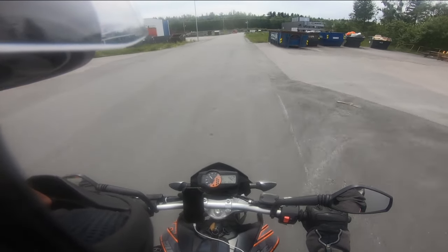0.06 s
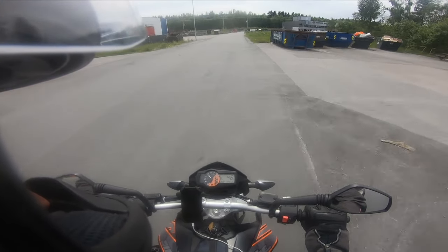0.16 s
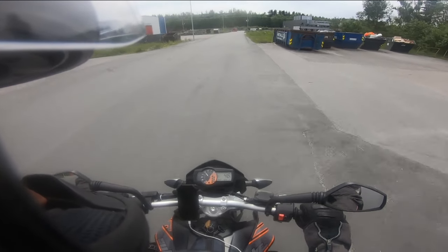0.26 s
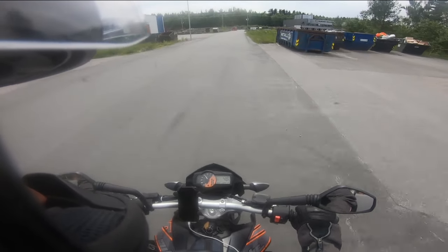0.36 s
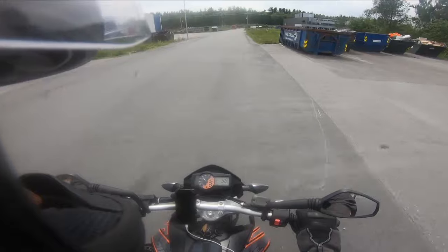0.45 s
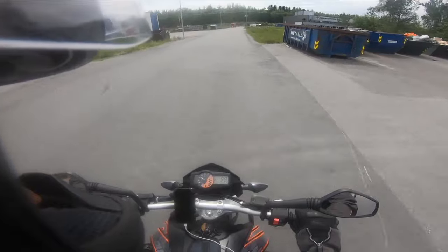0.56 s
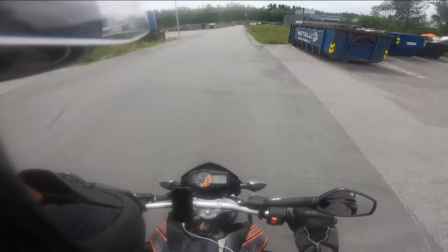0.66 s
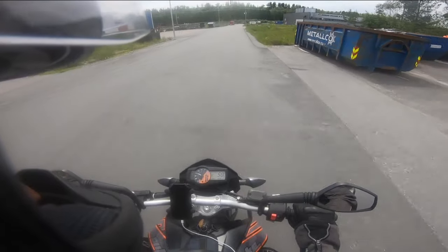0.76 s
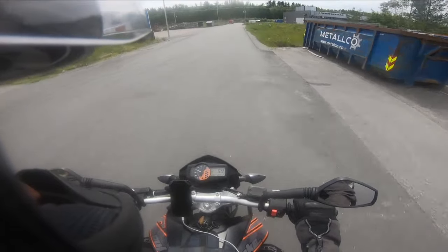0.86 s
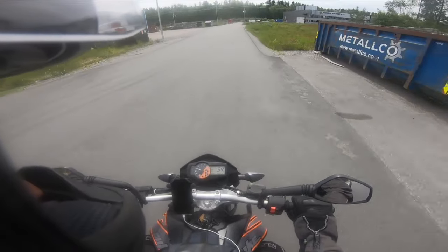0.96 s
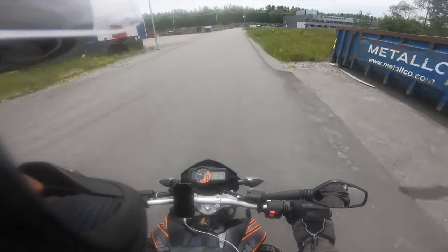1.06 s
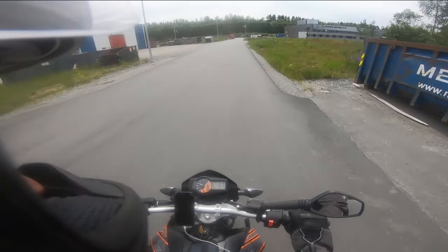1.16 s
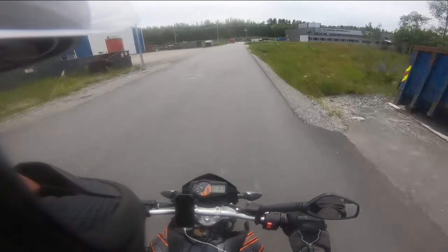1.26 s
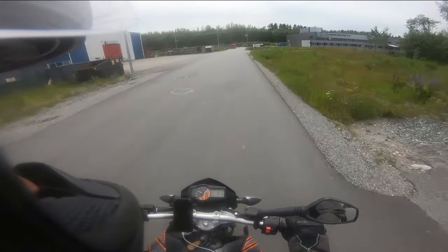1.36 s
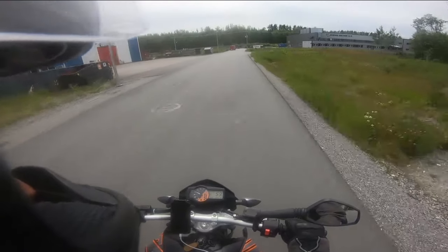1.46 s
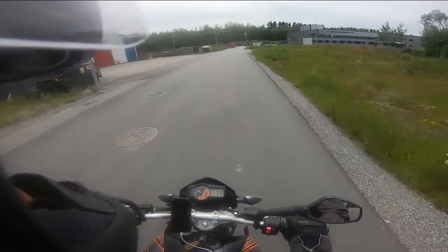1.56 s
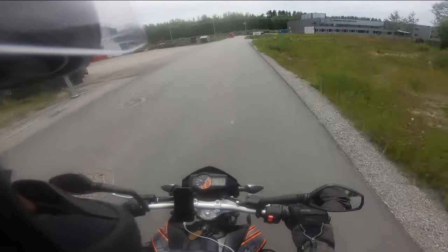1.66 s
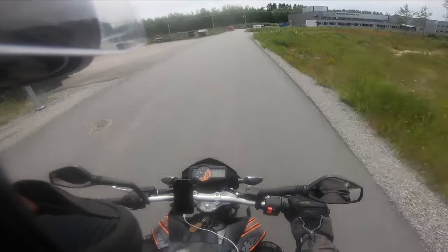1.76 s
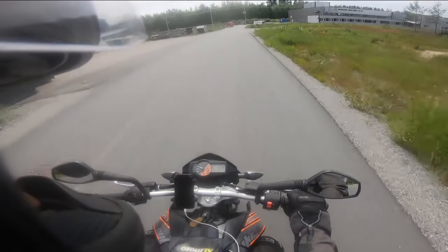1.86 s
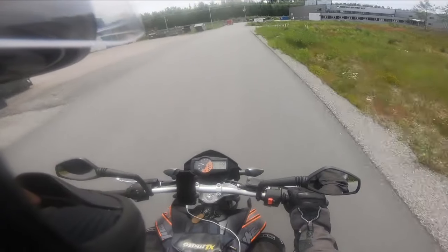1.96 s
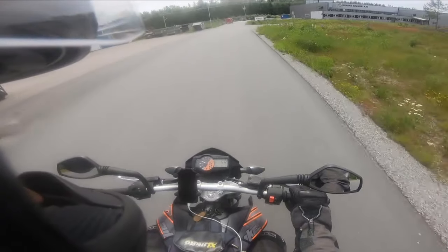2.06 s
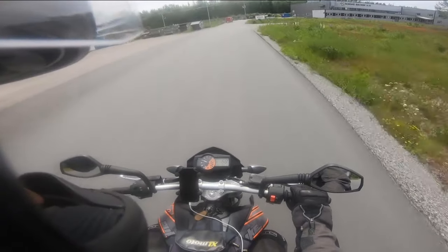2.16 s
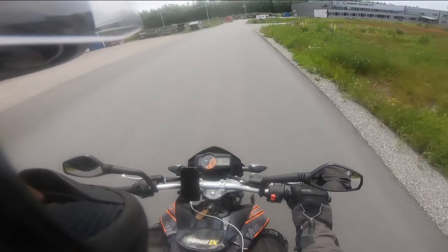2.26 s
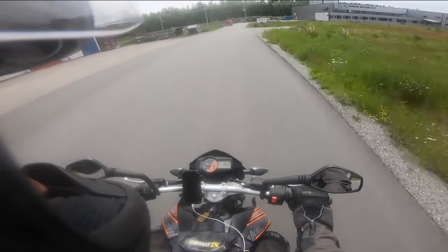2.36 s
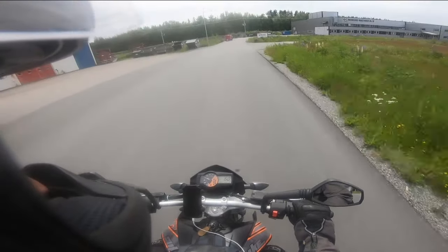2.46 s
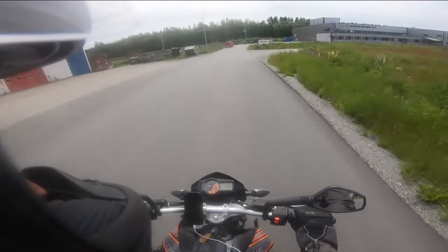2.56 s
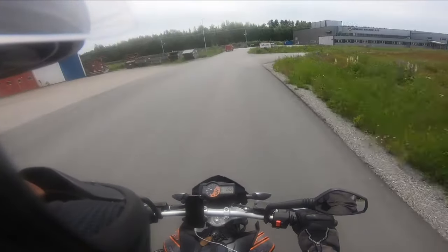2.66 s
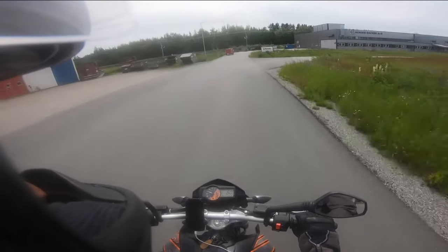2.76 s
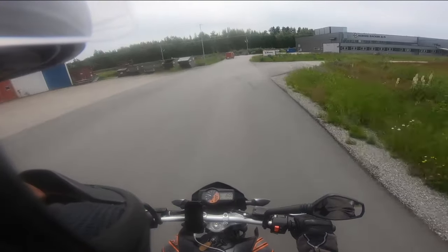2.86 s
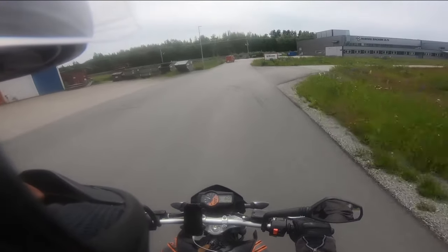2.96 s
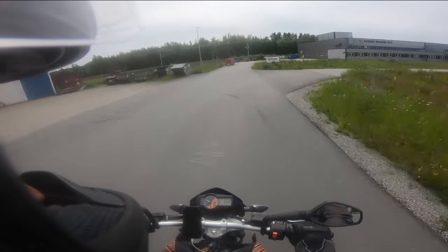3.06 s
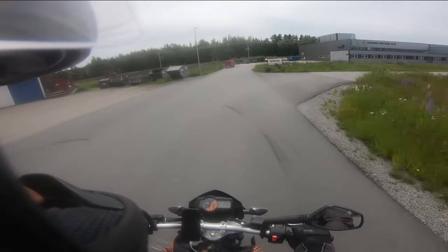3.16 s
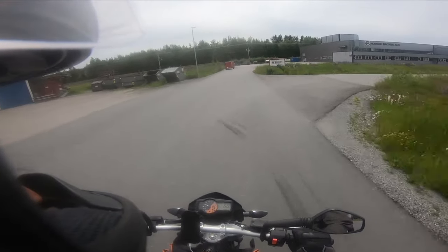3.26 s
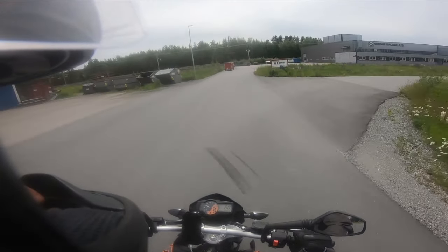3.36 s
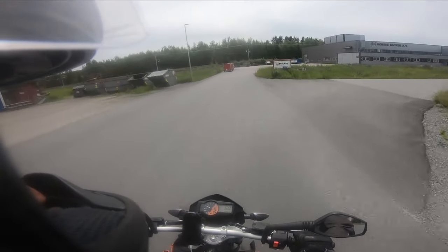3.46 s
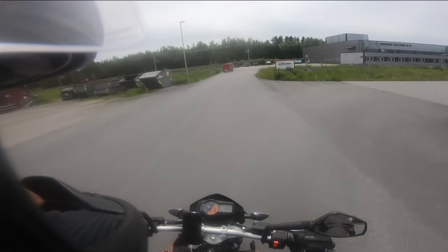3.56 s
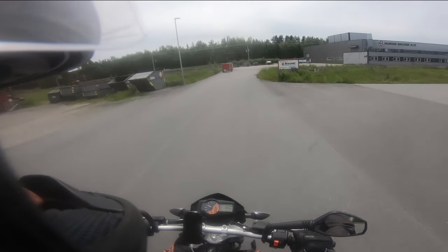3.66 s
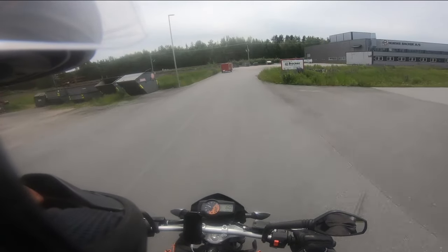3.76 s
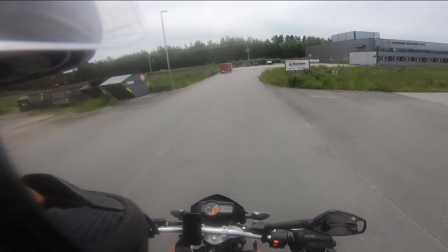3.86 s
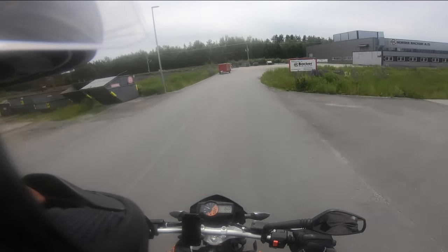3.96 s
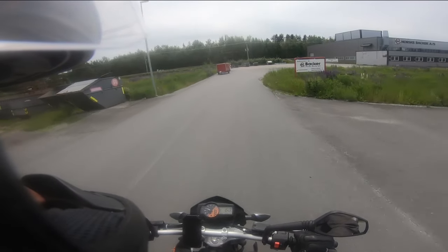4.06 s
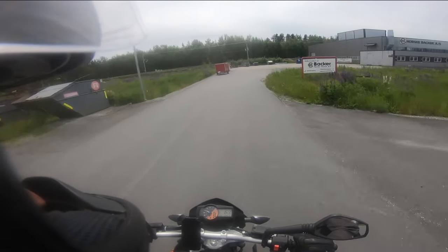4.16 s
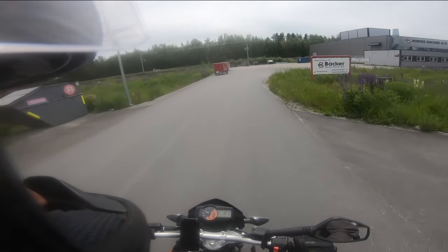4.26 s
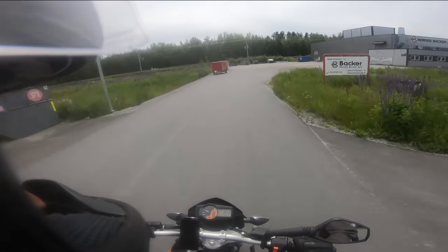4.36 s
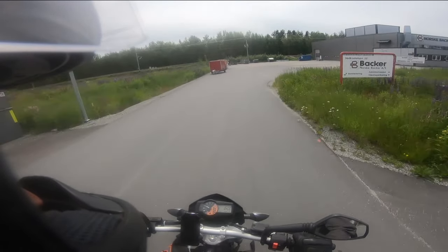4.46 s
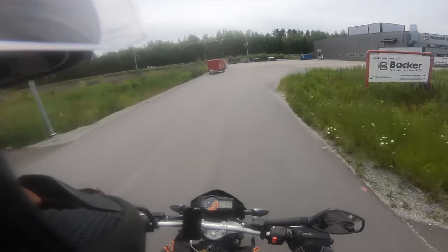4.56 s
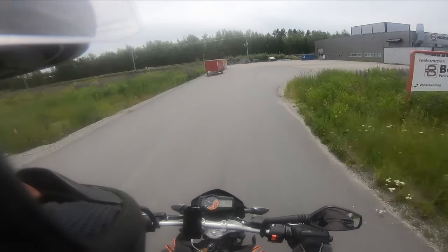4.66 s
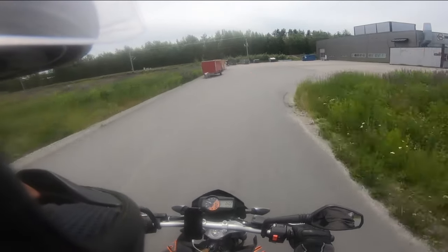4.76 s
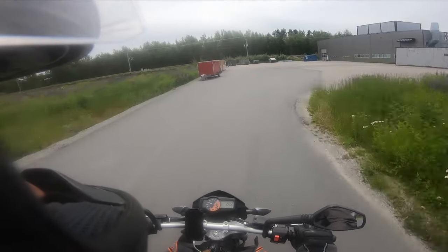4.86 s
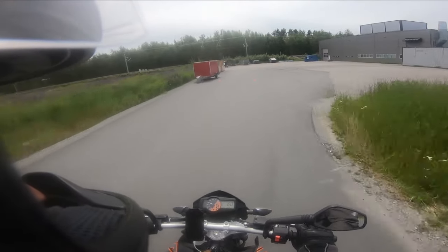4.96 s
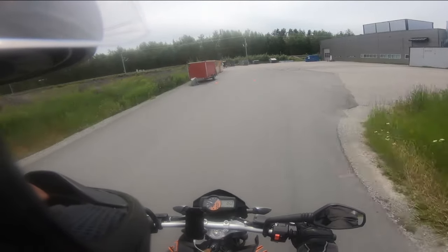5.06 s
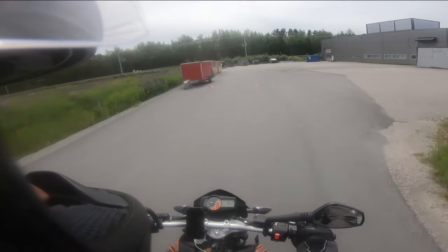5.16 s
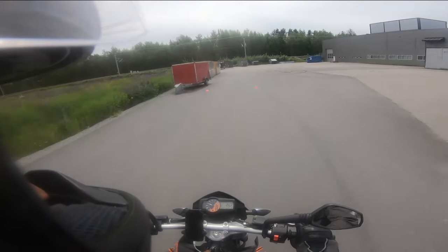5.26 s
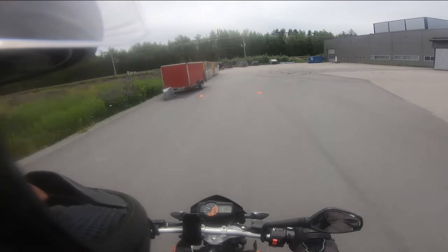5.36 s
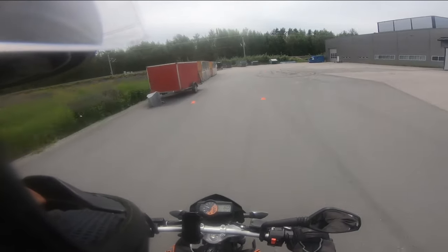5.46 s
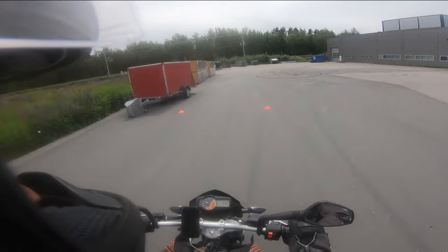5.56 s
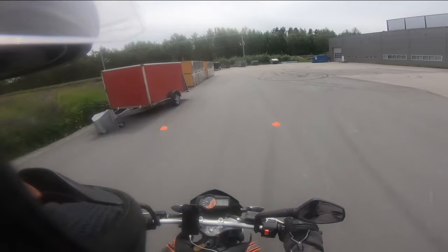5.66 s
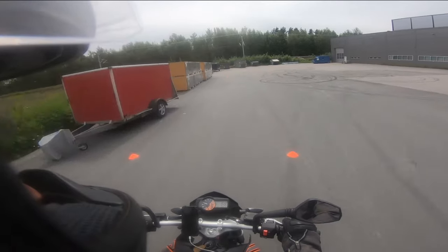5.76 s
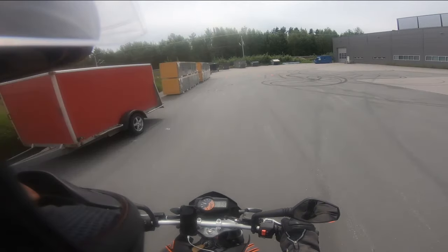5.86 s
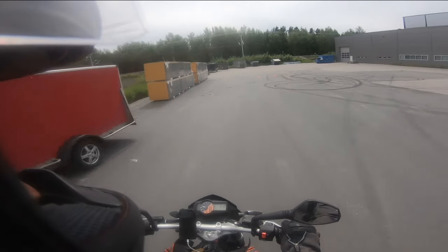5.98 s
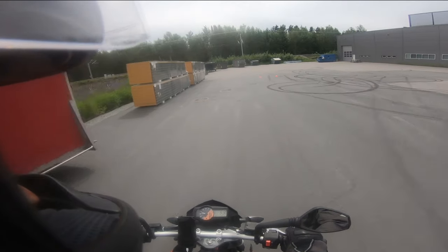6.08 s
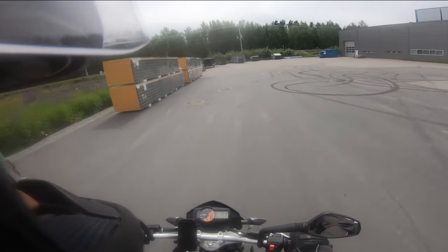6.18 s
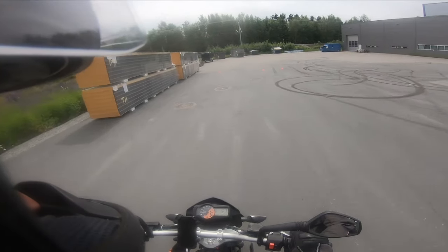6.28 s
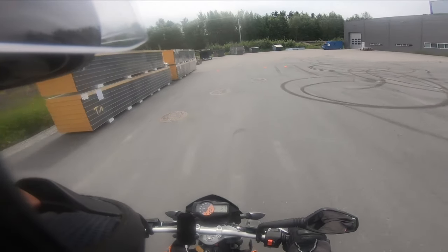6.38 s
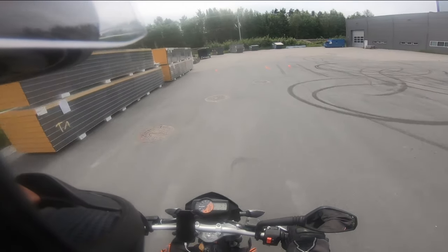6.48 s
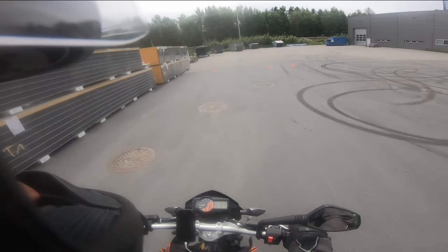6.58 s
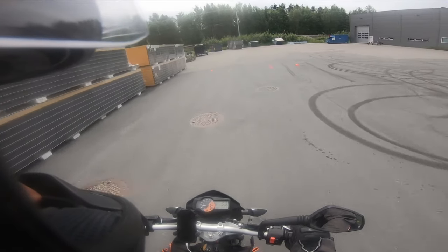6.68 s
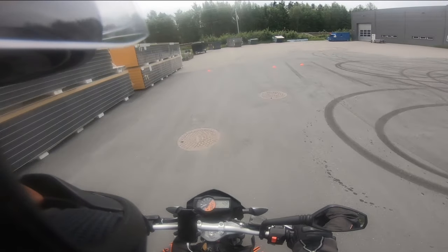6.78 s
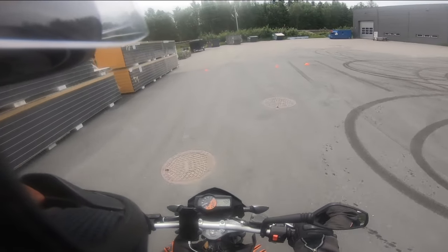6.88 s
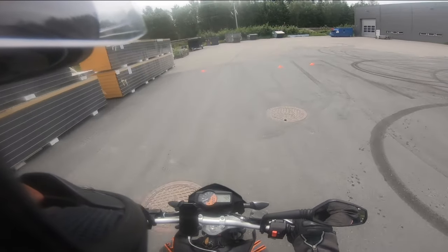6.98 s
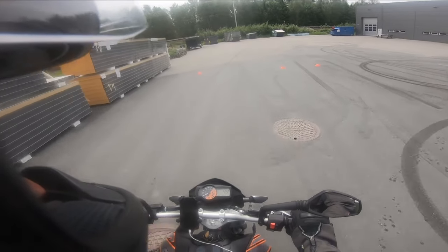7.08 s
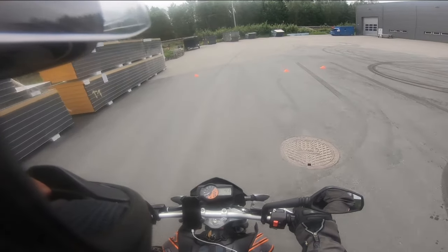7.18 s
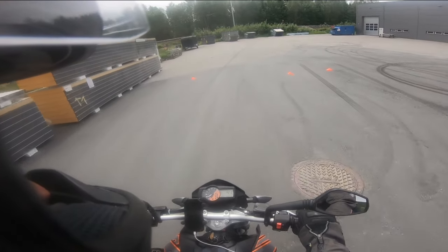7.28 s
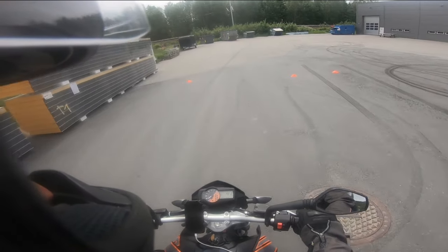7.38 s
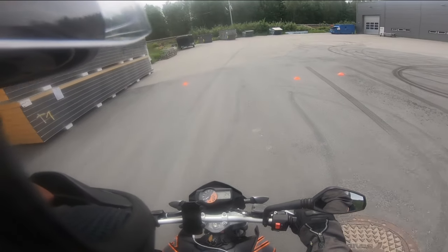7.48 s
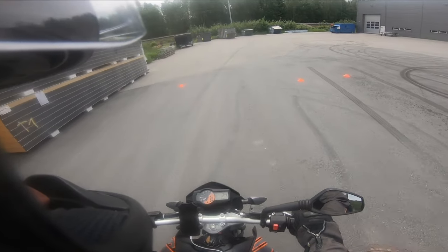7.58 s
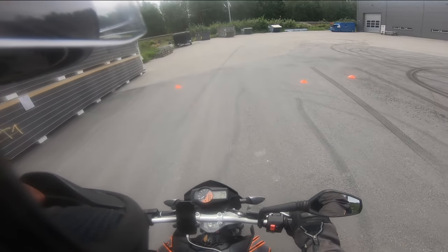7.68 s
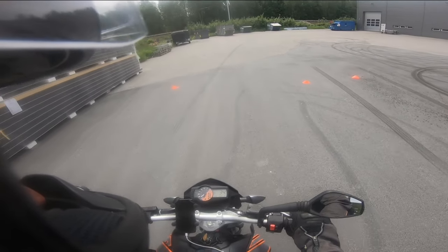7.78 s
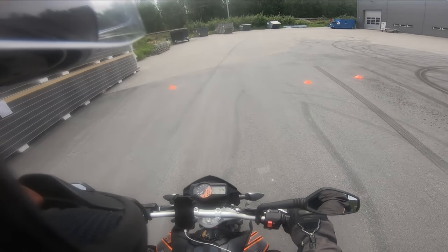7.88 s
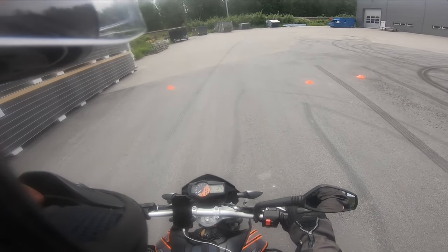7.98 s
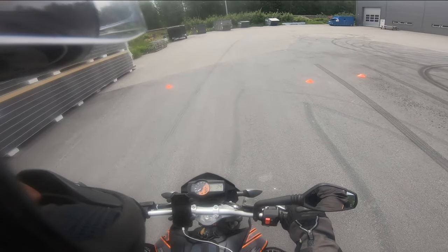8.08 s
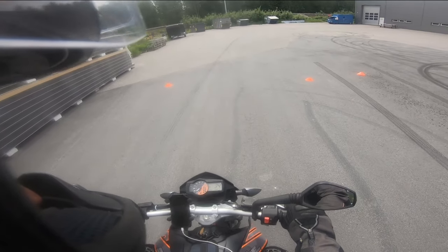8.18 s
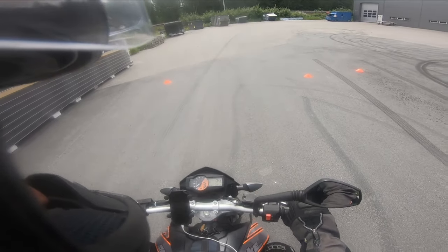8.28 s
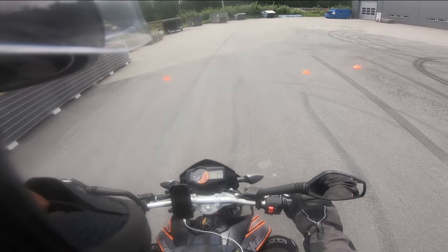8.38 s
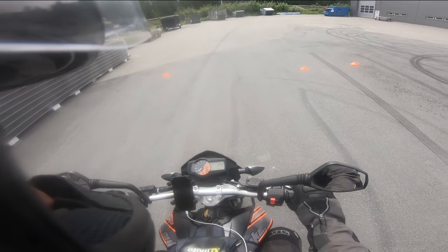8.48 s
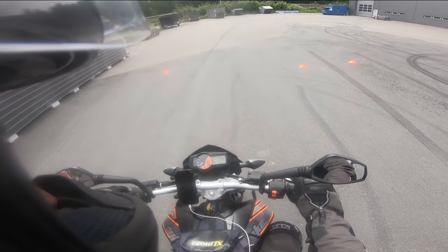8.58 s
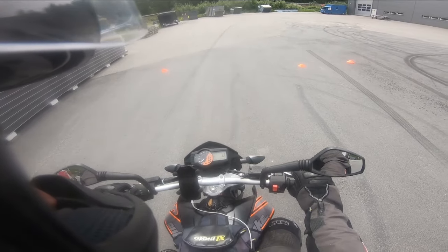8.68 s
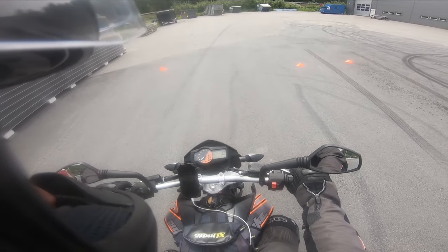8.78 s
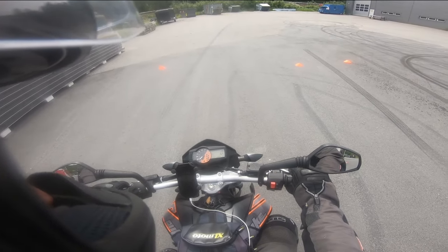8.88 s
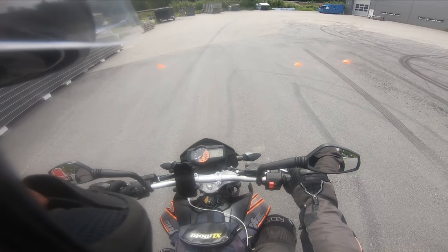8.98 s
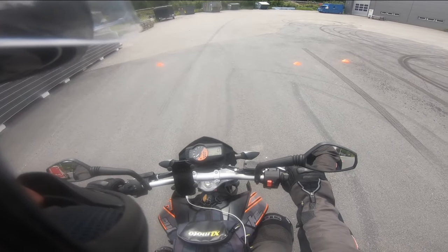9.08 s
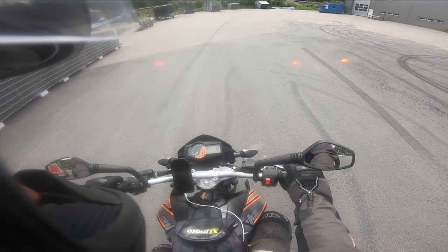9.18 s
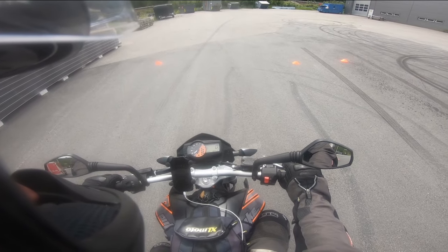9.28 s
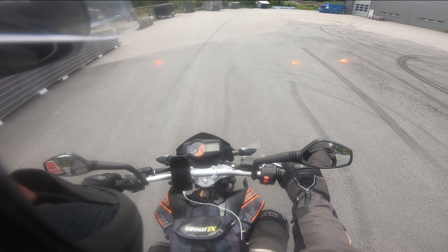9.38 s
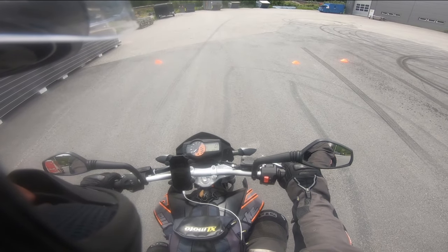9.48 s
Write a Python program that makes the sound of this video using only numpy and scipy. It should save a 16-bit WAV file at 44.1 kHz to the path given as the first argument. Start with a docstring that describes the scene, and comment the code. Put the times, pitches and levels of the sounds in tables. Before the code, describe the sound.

From a rider's helmet, loud low wind roar and buffeting with a wavering hollow note masks a motorcycle engine for about six seconds in an open lot. The wind then drops in uneven, darker puffs, the brake gives a faint short groan, and a slow single-cylinder idle emerges: deep exhaust thumps, ringing knocks, clattering valves, and one small metallic rattle.

```python
"""Motorcycle braking to idle

A single-cylinder motorcycle rolls across an open lot and brakes to a stop, heard from the rider's helmet.
Shaped noise follows the airspeed as wind; a gliding sine is the wavering low note shed off the helmet.
As the wind dies away in puffs the brake groans briefly, a slightly wavering tone, and the idle comes through:
a ringing knock and a low exhaust thump per firing, engine clatter, valve taps, a few ticks, one metallic rattle."""
import sys
import numpy as np
from scipy import signal
from scipy.fft import rfft, irfft, next_fast_len
from scipy.io import wavfile
from scipy.ndimage import uniform_filter1d

SR = 44100
rng = np.random.default_rng(int(sys.argv[2]) if len(sys.argv) > 2 else 0)


def unload_audio(sound):
    """Save the sound as a 16-bit wav file, at the path given as the first command line argument."""
    columns = np.transpose(np.atleast_2d(sound))
    # keep every value between -1 and 1, then stretch to whole-number steps
    steps = np.round(np.clip(columns, -1, 1) * 32767)
    wavfile.write(sys.argv[1], SR, steps.astype(np.int16))


N = 420273

# light air at the standstill: start_s, level_db
BREEZE = [(7.6, -54), (7.95, -36), (8.08, -44), (8.2, -36), (8.7, -28.5), (9, -28.5), (9.28, -31.5),
          (9.38, -24), (9.53, -21.5)]
# its spectrum: freq_hz, density_db_per_hz
BREEZE_COLOUR = [(20, -9.5), (55, -1.5), (110, -1), (170, -14.5), (300, -23.5), (800, -44.5), (3000, -70.5)]

# air passing the helmet: start_s, airspeed_m_per_s, turbulence_db
AIRFLOW = [(0, 10.04, -4), (1.05, 9.8, -3.5), (1.5, 8.9, 0), (1.9, 10.34, -3.5), (2.5, 9.96, -2.5),
           (2.75, 10.65, 1.5), (3.5, 11, 0), (4.4, 9.84, 0), (5.4, 10.28, 1), (6.2, 7.86, -1.5),
           (6.5, 5.95, -0.5), (7.0, 5.15, 1), (7.25, 2.87, 2), (7.87, 2.35, -2.5), (7.95, 1.3, -3),
           (8.2, .1, 3)]
RIDING_M_PER_S = 10
# borders between buffeting, roar, rush and hiss: edge_hz
WIND_EDGES_HZ = [141.4, 714, 2214]
# spectrum of the airflow: freq_hz, density_db_per_hz
WIND_COLOUR = [(12, -50), (20, -17.5), (102, -2), (250, -4.5), (303, -4), (387, -7.5), (1020, -11),
               (1740, -19), (2970, -36), (3880, -35), (5720, -45), (6620, -58), (8610, -76), (14600, -120)]
# ranges of eddies: level_at_riding_speed_db, airspeed_power, turbulence_share
ROAR, RUSH, HISS = (-16.5, 1.72, 0.62), (-22.5, 2.43, 1), (-35, 2.77, .05)
# gusts, and lulls where the strength is negative: centre_s, half_length_s, strength_db, brightness_db
GUSTS = [(0.644, 0.045, 1.5, 1), (1.301, 0.11, 3, -1.5), (1.587, 0.087, 1.4, -1.5), (1.731, 0.096, 0, -1.5),
         (2.874, 0.031, 2, 2.2), (3.77, 0.027, 1.5, 0), (3.894, 0.018, 2.5, 1), (4.09, 0.024, -1.5, -.5),
         (4.243, 0.043, 1.5, 1.5), (4.337, 0.035, -2, -1.5), (4.679, 0.088, 0.7, .5),
         (4.856, 0.033, -1, -2.2), (4.99, 0.035, 1.2, 3), (5.151, 0.078, -0.6, 0), (5.357, 0.023, 0.5, 1),
         (5.568, 0.035, -1.7, -1.5), (5.808, 0.079, 2, 2.5), (5.974, 0.092, 0.5, -2.5),
         (6.213, 0.16, 2.4, -1), (6.35, 0.013, -4.5, 1), (6.71, 0.06, -2, 2.5), (6.967, 0.1, 3.5, -3),
         (7.403, 0.063, 3.5, -1), (7.59, 0.04, 5, -2), (7.712, 0.045, 3.5, -6), (7.87, 0.02, -1.5, 7)]
# share of dull eddies gained as the air slows
DARKENS_BELOW_M_PER_S, DARKENING_PER_M_PER_S = 9.2, 0.11
# big eddies striking the microphone port: start_s, level_at_riding_speed_db
BUFFET = [(.25, -17.5), (.5, -20.5), (1.55, -17), (1.85, -19.5), (2.25, -26.5), (2.45, -15.5), (3.2, -18),
          (5.1, -20), (5.9, -22), (6.3, -21), (6.55, -14.5), (6.9, -20.5), (7.4, -17)]
# their spectrum: freq_hz, density_db_per_hz
BUFFET_COLOUR = [(18, -14.5), (30, -9.5), (50, -1.5), (70, -2), (110, -0.5), (150, -5), (190, -16),
                 (300, -43)]
# bright gusts tearing at the visor edge: centre_hz, width_hz, level_at_1_db_brightness_db, airspeed_power
SURGE = (1949.5, 1099.5, -39.5, 3.5)
# vortices shed by the helmet: start_s, shedding_hz, level_db
VORTEX = [(0, 127.3, -16), (.12, 110.8, -15.5), (.17, 136.3, -21.5), (.28, 179.3, -22.5),
          (.38, 182.5, -19.5), (.45, 159.3, -21), (.51, 130, -15.5), (.57, 113.4, -13), (.67, 138.4, -14.5),
          (.71, 112, -21.5), (.78, 105.8, -13), (.83, 136.5, -14), (.88, 183, -27.5), (1.05, 130, -27.5),
          (1.13, 112.3, -15), (1.21, 104.8, -15.5), (1.26, 117, -23), (1.35, 130, -15),
          (1.43, 125.6, -33.5), (1.55, 85, -23.5), (1.66, 112, -15), (1.72, 138.5, -15), (1.82, 153, -18),
          (1.89, 180, -20), (1.99, 161.2, -19), (2.05, 137.8, -13.5), (2.1, 113.7, -12), (2.19, 129, -15),
          (2.24, 128, -14), (2.29, 150.8, -18.5), (2.35, 120.3, -13.5), (2.47, 98, -19.5),
          (2.56, 124.8, -16), (2.67, 126.8, -28), (2.76, 106.3, -16.5), (2.83, 85.7, -13.5),
          (2.92, 126, -17.5), (3.08, 110.1, -22.5), (3.19, 172.8, -17.5), (3.4, 151, -36),
          (3.53, 135, -20.5), (3.6, 134.6, -21), (3.7, 128.1, -18.5), (3.9, 106, -27), (4.0, 185.1, -24),
          (4.1, 163.3, -21), (4.19, 105.4, -18), (4.33, 112, -21.5), (4.45, 84.4, -21), (4.55, 99.9, -21),
          (4.7, 71.6, -21), (4.83, 95.1, -19.5), (4.97, 96.9, -27.5), (5.2, 111.3, -20.5),
          (5.45, 96.1, -20), (5.58, 97, -18.5), (5.8, 95.4, -32), (6.3, 87.4, -20.5), (7.2, 85, -47),
          (7.9, 85, -91)]
# phase wobble of a note at STEADY_DB; a stronger note is steadier
VORTEX_WOBBLE_RAD, STEADY_DB, STEADYING_DB_PER_DB = 0.46, -12.5, .55
# single puffs of slow air on the microphone port: centre_s, half_length_s, pitch_hz, level_db
PUFFS = [(6.219, 0.015, 220, -15), (6.415, 0.011, 200, -14), (6.446, 0.004, 620, -33),
         (6.565, 0.013, 240, -19), (6.609, .007, 261.6, -24), (6.775, 0.006, 231, -21),
         (6.822, .016, 334, -22.5), (7.101, .008, 292, -22), (7.16, 0.0092, 177, -17.5),
         (7.36, 0.0099, 150, -23.5), (7.433, .009, 258, -30), (7.59, 0.03, 177, -27.5),
         (7.665, .011, 193, -25), (7.754, 0.0078, 222, -25), (7.864, 0.013, 226, -25)]

GROAN_AT_S, GROAN_HALF_S, GROAN_HZ, GROAN_DB = 7.98, .11, 421, -44

# small metal parts ticking and rattling: start_s, level_db, decay_s
TICKS = [(7.502, -47, .005), (7.593, -49, .005), (7.637, -51, 0.0036), (7.719, -50, 0.0037),
         (7.909, -47, 0.0066), (8.104, -56, .004), (8.244, -39, 0.0086), (8.380, -35.5, .004),
         (8.384, -41, 0.025), (8.389, -33, 0.0025), (8.398, -33, 0.0037), (8.404, -43, .012),
         (8.416, -44, .006), (8.450, -47, 0.008)]
# their ringing: mode_hz, width_hz, level_db
TICK_MODES = [(1650, 460, 0), (2600, 400, 2.5), (2920, 200, 5), (3300, 350, 3), (3750, 400, -3),
              (4540, 600, -3), (5700, 700, -9.5), (6788, 450, -18), (7500, 400, -24)]

# engine speed until the idle is heard: start_s, firings_per_s
SPEED = [(0, 36), (5.4, 38), (6.4, 22), (7.1, 13.1), (7.8, 13.1)]
# engine loudness at the helmet: start_s, exhaust_peak_db, mechanical_db, mechanical_lows_extra_db
ENGINE = [(0, -21.5, -37.5, 1), (7.2, -24.5, -48, 1), (7.7, -31, -42, -4), (7.98, -18.5, -38.5, -6),
          (8.25, -17, -34, 1.5), (8.4, -10, -33, 0.5), (8.82, -9.5, -37, 2.5), (8.9, -16, -36.5, 0),
          (9.14, -15.5, -34.5, 0.5), (9.53, -18, -34, 0)]
# valves clattering shut: after_thump_s, decay_s, strength_db
VALVES = [(.009, .005, -4), (.021, .004, -4), (.033, .004, 0.5)]
# ringing of the valve cover: mode_hz, width_hz, level_db
VALVE_MODES = [(2350, 400, -2), (3500, 300, 2), (4400, 600, -1.5), (5800, 500, -10.5), (6600, 400, -15)]
VALVE_END_DB = -56  # at the final mechanical level
# light contacts in each cycle: after_thump_s, decay_s, strength_db
CONTACTS = [(.044, 0.014, -2), (.068, 0.0052, -6.5), (0.0071, .005, -9), (.013, .005, -5)]
# ringing of the crankcase and cylinder fins: mode_hz, width_hz, level_db
CASE_MODES = [(606, 95, 2), (784, 78, -4), (1070, 340, -5.5), (1606, 110, -10), (1785, 150, -9.5),
              (2000, 87, -21), (2490, 70, -24), (3060, 43, -22), (3350, 70, -27.5), (3520, 110, -18.5),
              (3860, 110, -18.5), (4000, 80, -34), (4310, 64, -21.5), (4800, 130, -28), (5940, 170, -28.5),
              (6650, 130, -38.5)]
# spectrum of the mechanical noise: freq_hz, density_db_per_hz
CLATTER_COLOUR = [(140, -17), (200, -3.5), (300, -6.5), (480, -8.5), (630, 0.5), (800, -8), (1000, -9.5),
                  (1500, -11), (2000, -19), (2400, -18), (3500, -24), (4700, -27), (5400, -35), (7000, -42),
                  (10000, -65)]
# combustion knocks once the wind has dropped: start_s, body_db, upper_ring_db
KNOCKS = [(7.797, -50, -45.5), (7.871, -50, -41), (7.948, -39, -42), (8.025, -44, -38), (8.102, -34, -37),
          (8.178, -25.5, -34), (8.252, -23, -33.5), (8.325, -29, -40), (8.403, -30, -38), (8.479, -22, -41),
          (8.557, -29, -39), (8.634, -25, -40), (8.713, -35, -43), (8.786, -26, -39), (8.863, -25, -45),
          (8.939, -24, -41), (9.017, -34, -41), (9.093, -24, -46), (9.166, -24, -40), (9.241, -24.5, -41),
          (9.318, -23, -34), (9.397, -28, -38), (9.475, -30, -44)]
# ringing of the cylinder, the first mode being the body: mode_hz, width_hz, level_db
KNOCK_MODES = [(635, 135, -2), (810, 190, -1), (1240, 190, -3), (1680, 97, -1.5), (2150, 230, -7.5)]
THUMP_LAG_S = .033

CUTOFF_HZ = 9000


def from_db(db):
    """Decibels to gain."""
    return 10 ** (np.asarray(db) / 20)


def rms_one(x):
    """Scale to unit power."""
    return x / np.sqrt(np.mean(x ** 2) + 1e-20)


def in_time(rows):
    """Interpolate each column of a curve at every sample."""
    s, *columns = np.transpose(rows)
    return [np.interp(np.arange(N) / SR, s, c) for c in columns]


def bell(at_s, half_s, power=2):
    """Smooth swell and fade around one moment, peak 1."""
    t = np.arange(N) / SR
    return np.exp(-np.minimum(((t - at_s) / half_s) ** power, 20))


def drift(rate_hz):
    """Smooth random wandering with spread 1, drawn at every 20th sample."""
    r = np.exp(-40 * np.pi * rate_hz / SR)
    noise = rng.standard_normal(N // 20 + 4002)
    slow = signal.lfilter([1], [1, -2 * r, r * r], noise)[4000:]  # drop the settling
    return np.interp(np.arange(N) / 20, np.arange(len(slow)), rms_one(slow))


def coloured_noise(colour):
    """Noise with the given spectrum and unit power."""
    size = next_fast_len(N, True)
    hz, db = np.transpose(colour)
    bins_hz = np.maximum(np.arange(size // 2 + 1) * SR / size, 1)
    gain = from_db(np.interp(np.log(bins_hz), np.log(hz), db, left=-np.inf, right=-np.inf))
    return rms_one(irfft(rfft(rng.standard_normal(size)) * gain, size)[:N])


def butter(x, hz, kind, order=4):
    """Causal Butterworth filter."""
    return signal.sosfilt(signal.butter(order, hz, kind, fs=SR, output="sos"), x)


def resonate(x, hz, width_hz):
    """One resonance with gain 1 at its top."""
    r = np.exp(-np.pi * width_hz / SR)
    feedback = [1, -2 * r * np.cos(2 * np.pi * hz / SR), r * r]
    return signal.lfilter(np.array([1, 0, -1]) * (1 - r * r) / 2, feedback, x)


def resonate_twice(x, hz, width_hz):
    """Two equal resonances in series: steeper skirts."""
    return resonate(resonate(x, hz, width_hz), hz, width_hz)


def modes_ring(force, modes):
    """A gritty contact force sets every mode ringing with a strength and phase of its own."""
    out = 0
    for hz, width_hz, db in modes:
        grit = force * rng.standard_normal(N)
        # two resonators in series have 0.64 of the width of one
        out = out + from_db(db) * rms_one(resonate_twice(grit, hz, width_hz / .64))
    return rms_one(out)


def struck(clicks, modes, uneven_db=3):
    """Hard contacts set each mode ringing at once, with a new strength every time."""
    out = 0
    for k, (hz, width_hz, db) in enumerate(modes):
        r, w = np.exp(-np.pi * width_hz / SR), 2 * np.pi * hz / SR
        force = clicks * from_db(db + uneven_db * rng.standard_normal(N)) + 1e-18
        ring = signal.lfilter([0, np.sin(w)], [1, -2 * r * np.cos(w), r * r], force)
        out = out + (-1) ** k * ring
    return out


def breeze():
    """Light air at the standstill: low coloured noise."""
    return from_db(in_time(BREEZE)[0]) * coloured_noise(BREEZE_COLOUR)


def airflow():
    """Airspeed in m/s, the same in dB against riding speed, and the turbulence in dB."""
    speed, turbulence_db = in_time(AIRFLOW)
    return speed, 20 * np.log10(np.maximum(speed, 1e-3) / RIDING_M_PER_S), turbulence_db


def gusts():
    """Each gust swells and fades as a bell; together they give a level and a brightness in dB."""
    bells = np.array([bell(s, half_s) for s, half_s, _, _ in GUSTS])
    return np.array(GUSTS)[:, 2:].T @ bells


def eddies(low_hz, high_hz, slow, slow_hz, order=2):
    """One range of eddy sizes; as the air slows, its finer eddies drop out and it darkens."""
    noises = [coloured_noise(WIND_COLOUR), coloured_noise(WIND_COLOUR)]
    fast, dull = butter(butter(noises, low_hz, "high", order=5), high_hz, "low", order=5)
    dull = butter(dull, slow_hz, "low", order=order)
    return np.sqrt(1 - slow) * rms_one(fast) + np.sqrt(slow) * rms_one(dull)


def roughened(noise, unsteadiness_db):
    """Noise with fast swells and dips, back at unit power."""
    return rms_one(noise * from_db(unsteadiness_db))


def wind(shedding, puff_db=1.5):
    """Big eddies buffet the port; small ones come in spurts. All grow with airspeed, the finest most."""
    speed, speed_db, turbulence_db = airflow()
    gust_db, bright_db = gusts()
    roar_db, rush_db, hiss_db = [db + power * speed_db + share * turbulence_db + gust_db
                                 for db, power, share in (ROAR, RUSH, HISS)]
    low_hz, middle_hz, high_hz = WIND_EDGES_HZ
    slow = np.clip(DARKENING_PER_M_PER_S * (DARKENS_BELOW_M_PER_S - speed), .01, .9)

    # slow air strikes the port in uneven puffs
    buffet_db = in_time(BUFFET)[0] + speed_db + slow * (gust_db + puff_db * drift(9.6))
    buffet = from_db(buffet_db) * coloured_noise(BUFFET_COLOUR)

    # the pressure swing of the big eddies opens and chokes the fine turbulence
    pressure = buffet + shedding
    swing = pressure / np.sqrt(uniform_filter1d(pressure ** 2, SR // 10) + 1e-12)
    spurts = drift(300)

    roar = eddies(low_hz, middle_hz, slow, slow_hz=352)
    roar = roughened(roar, 0.84 * spurts + .5 * drift(25))
    rush = eddies(middle_hz, high_hz, slow, slow_hz=1210)
    rush = roughened(rush, 2.0 * spurts + 0.67 * drift(17) + 0.23 * swing)
    hiss = eddies(high_hz, CUTOFF_HZ, slow ** 0.51, slow_hz=3800, order=4)
    hiss = roughened(hiss, 1.7 * spurts + 0.49 * drift(23) + 0.33 * swing)
    return (buffet + from_db(roar_db - bright_db) * roar + from_db(rush_db) * rush
            + from_db(hiss_db + bright_db) * hiss)


def surges(top_hz=3400):
    """The brighter gusts tear at the visor edge and add a forward rush in the upper middle."""
    hz, width_hz, level_db, power = SURGE
    rush = resonate_twice(rng.standard_normal(N), hz, width_hz)
    rush = rms_one(butter(rush, top_hz, "low"))
    return from_db(level_db + power * airflow()[1]) * np.maximum(gusts()[1], 0) * rush


def vortex(flicker_db=0.1):
    """Vortices peel off the helmet almost regularly: a gliding low note, steady when strong, ragged when weak."""
    hz, level_db = in_time(VORTEX)
    wobble_rad = VORTEX_WOBBLE_RAD * from_db(STEADYING_DB_PER_DB * np.minimum(STEADY_DB - level_db, 10))
    phase = 2 * np.pi * np.cumsum(hz) / SR + wobble_rad * drift(25)
    return from_db(level_db) * rms_one(np.sin(phase) * from_db(flicker_db * drift(28)))


def puffs(raggedness_rad=.95):
    """Single eddies flap across the port: a few ragged swings of pressure each."""
    t = np.arange(N) / SR
    wander = raggedness_rad * drift(110)
    out = 0
    for s, half_s, hz, db in PUFFS:
        out = out + from_db(db) * bell(s, half_s) * np.sin(2 * np.pi * hz * (t - s) + wander)
    return np.sqrt(2) * out


def brake():
    """The pads stick and slip on the disc as the wheel stops: a short, slightly wavering tone."""
    t = np.arange(N) / SR
    tone = np.sin(2 * np.pi * GROAN_HZ * t + 0.2 * drift(15))
    return from_db(GROAN_DB) * bell(GROAN_AT_S, GROAN_HALF_S, power=4) * tone


def ticks(chatter_db=-2, snap_db=-4):
    """Loose metal parts meet with a hard snap, then chatter briefly and ring."""
    t = np.arange(N) / SR
    force, snaps = np.zeros(N), np.zeros(N)
    for s, db, decay_s in TICKS:
        force += from_db(db) * (t > s) * np.exp(-np.minimum(np.abs(t - s) / decay_s, 20))
        snaps[int(s * SR)] += from_db(db + snap_db)
    force_rms = np.sqrt(np.mean(force ** 2))
    chatter = from_db(chatter_db) * force_rms * modes_ring(force + 1e-12, TICK_MODES)
    return chatter + butter(struck(snaps, TICK_MODES), 8000, "low")


def firings(uneven_db=.5):
    """One click per exhaust stroke, a little uneven in strength; at idle each follows its combustion knock."""
    idle = ((np.array(KNOCKS)[:, 0] + THUMP_LAG_S) * SR).astype(int)
    cycles = np.cumsum(in_time(SPEED)[0]) / SR
    # count cycles back from the first idle firing
    riding = np.flatnonzero(np.diff(np.floor(cycles[:idle[0]] - cycles[idle[0]])))
    at = np.concatenate([riding, idle])
    clicks = np.zeros(N + SR)
    clicks[at] = from_db(uneven_db * rng.standard_normal(len(at)))
    return clicks[:N]


def contact_force(clicks, contacts):
    """Repeat one cycle of decaying contacts after every click."""
    t = np.arange(SR // 8) / SR
    cycle = sum(from_db(db) * (t > s) * np.exp(-np.abs(t - s) / decay_s) for s, decay_s, db in contacts)
    return signal.fftconvolve(clicks, cycle)[:N]


def valves(clicks):
    """The valve gear adds short bright rasps to every cycle."""
    return from_db(VALVE_END_DB) * modes_ring(contact_force(clicks, VALVES) + 1e-12, VALVE_MODES)


def mechanics(clicks, ring_db=-3, churn_db=-6, steady=0.24):
    """Valve and piston contacts ring the case and pulse the churn of chain and gears."""
    blows = contact_force(clicks, CONTACTS) * from_db(2.0 * drift(8.5))
    churn = coloured_noise(CLATTER_COLOUR) * (1 + 0.99 * blows) * from_db(2.0 * drift(150))
    return from_db(ring_db) * modes_ring(blows + steady, CASE_MODES) + from_db(churn_db) * rms_one(churn)


def gas_rush(clicks, level_db=-23, lag_s=0.019, length_s=0.034, low_hz=180, high_hz=460):
    """Exhaust gas flutters out of the silencer just behind each thump: gated band noise."""
    t = np.arange(-SR // 10, SR // 10) / SR
    gate = signal.fftconvolve(clicks, np.exp(-((t - lag_s) / length_s) ** 2), "same")
    gas = rms_one(butter(rng.standard_normal(N), [low_hz, high_hz], "band", order=2))
    return from_db(level_db) * gate * gas


def exhaust(clicks, puff_hz=96, puff_s=.0076, return_s=.0172, deepening=.8):
    """Each firing sends out a pressure puff that returns twice, weaker and deeper."""
    t = np.arange(-SR // 10, SR // 10) / SR
    thump = 0
    for k, level_db in enumerate([0, -4, -16]):
        age = t - k * return_s
        swing = np.cos(2 * np.pi * puff_hz * deepening ** k * age)
        thump = thump + from_db(level_db) * swing * np.exp(-(age / puff_s) ** 2)
    return signal.fftconvolve(clicks, thump, "same")


def engine(clicks):
    """Exhaust, clatter and valves at their loudness at the helmet."""
    exhaust_db, mechanical_db, lows_db = in_time(ENGINE)
    clatter = mechanics(clicks)
    lows, highs = butter(clatter, 950, "low", order=3), butter(clatter, 950, "high", order=3)
    clatter = from_db(lows_db) * lows + highs
    tail = from_db(exhaust_db) * (exhaust(clicks) + gas_rush(clicks))
    taps = from_db(mechanical_db - mechanical_db[-1]) * valves(clicks)
    return tail + from_db(mechanical_db) * clatter + taps


def knock(scatter_s=.0005, detune=.04):
    """Each combustion rings the cylinder for milliseconds, every partial randomly late and detuned."""
    t = np.arange(SR // 10) / SR
    out = np.zeros(N + SR)
    for s, body_db, upper_db in KNOCKS:
        start = int(s * SR)
        for k, (hz, width_hz, db) in enumerate(KNOCK_MODES):
            late, sharp = rng.standard_normal(2)
            age = np.maximum(t - abs(late) * scatter_s, 0)
            fade = np.pi * width_hz * age
            swell = fade * np.exp(1 - fade)  # peak 1
            level = from_db(db + (upper_db if k else body_db))
            out[start:start + len(t)] += level * swell * np.sin(2 * np.pi * hz * (1 + detune * sharp) * age)
    return out[:N]


def scene():
    """Wind and motorcycle at one microphone."""
    shedding = vortex()
    air = breeze() + wind(shedding) + surges() + shedding + puffs()
    machine = brake() + ticks() + engine(firings()) + knock()
    return (air + machine)[None]


def record(dry, threshold_db=-15, squeeze=.4, follow_s=.02, ceiling=.85):
    """Gain control eases loud passages, the highest peaks are rounded and the treble is cut."""
    follow = np.exp(-1 / (follow_s * SR))
    power = signal.lfilter([1 - follow], [1, -follow], dry ** 2)
    level_db = 10 * np.log10(power + 1e-12)
    held = dry * from_db(-squeeze * np.maximum(level_db - threshold_db, 0))
    rounded = held / (1 + (held / ceiling) ** 6) ** (1 / 6)
    return butter(rounded, CUTOFF_HZ, "low", order=10)


dry = scene()
out = record(dry)
unload_audio(out)
```